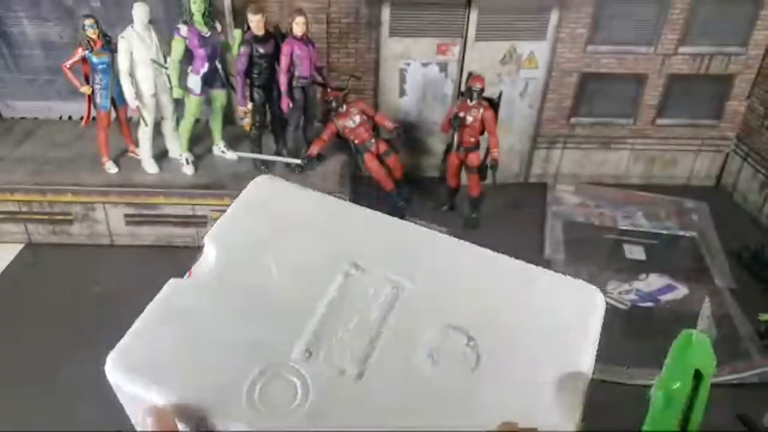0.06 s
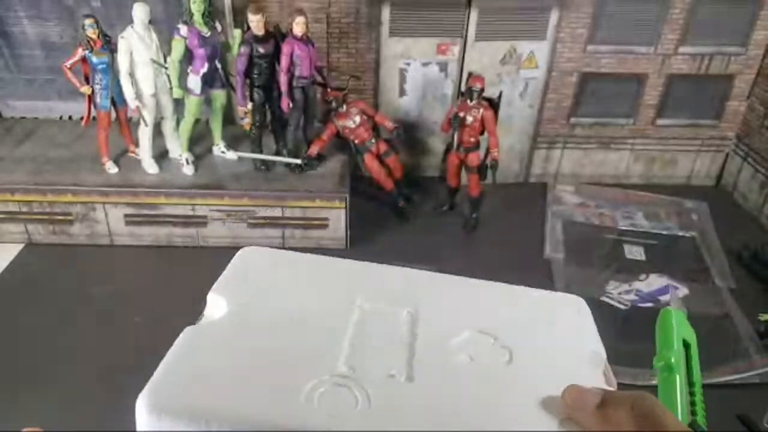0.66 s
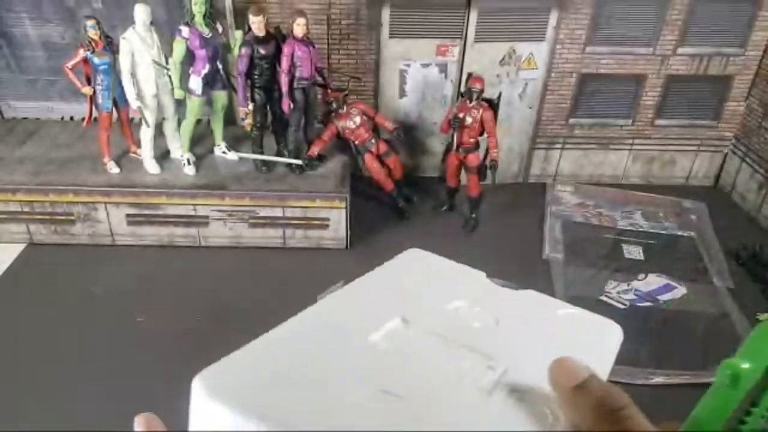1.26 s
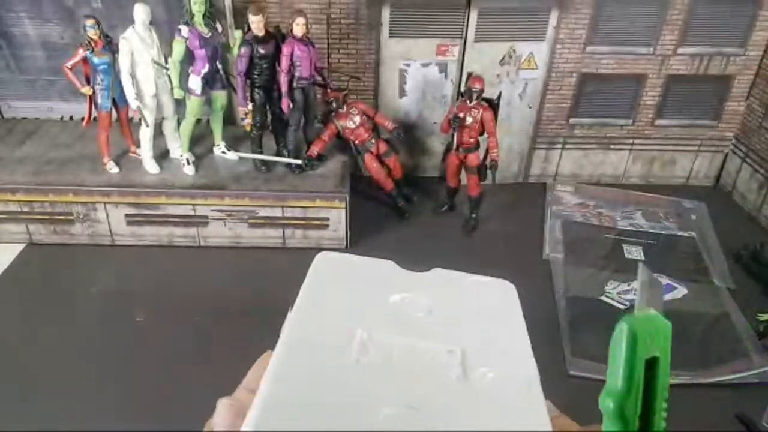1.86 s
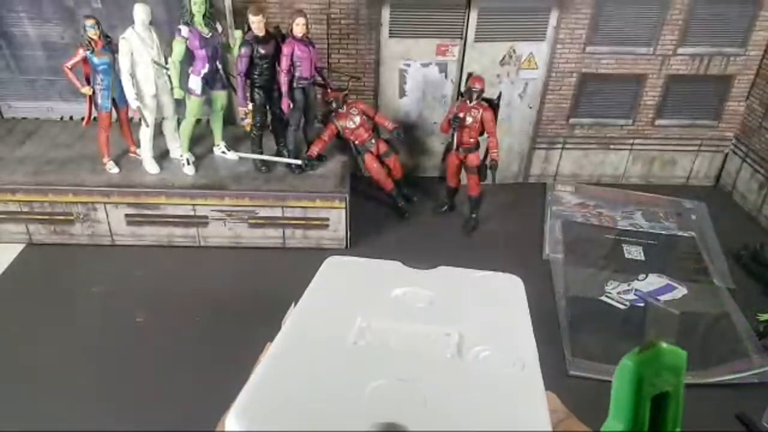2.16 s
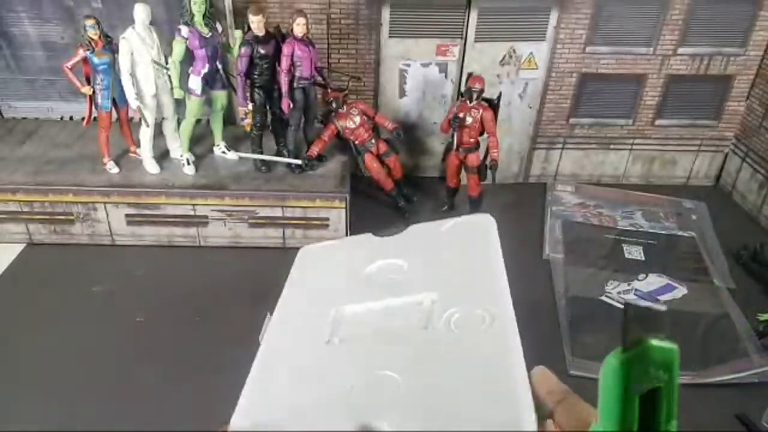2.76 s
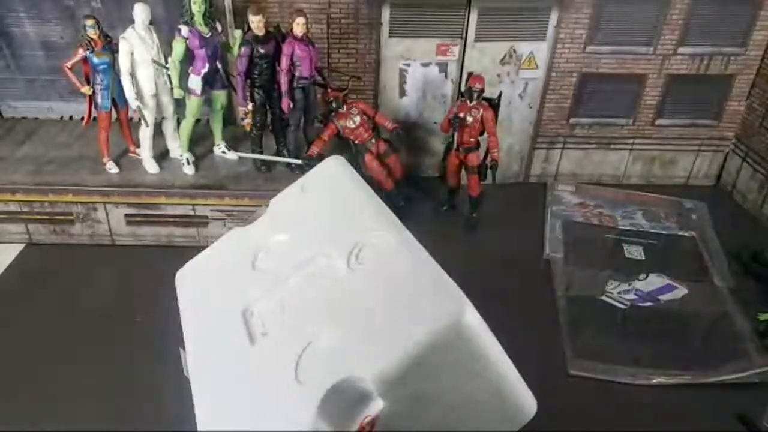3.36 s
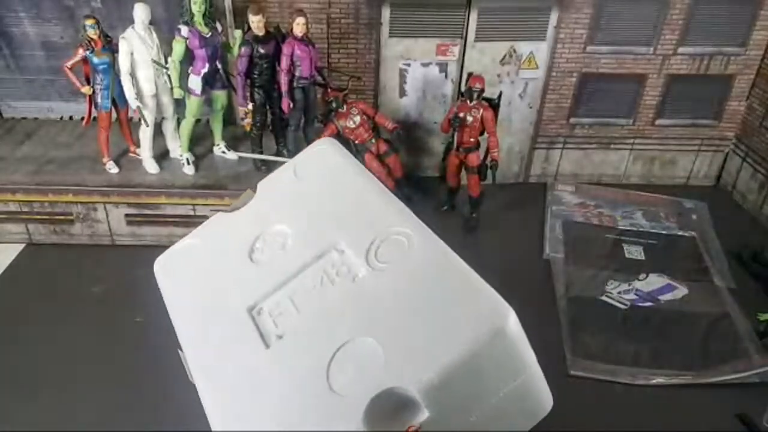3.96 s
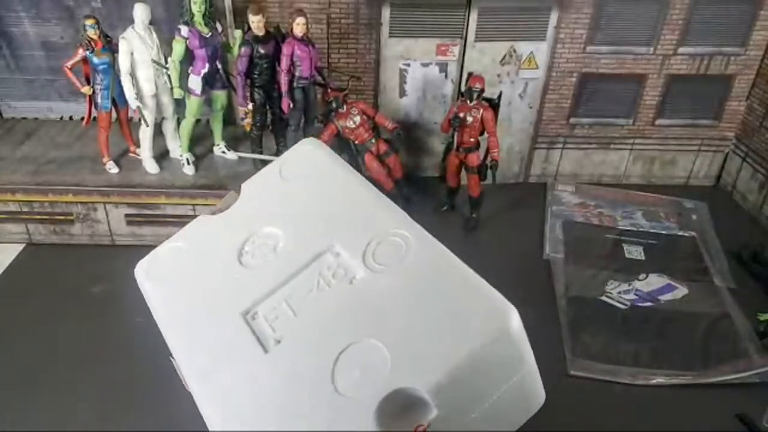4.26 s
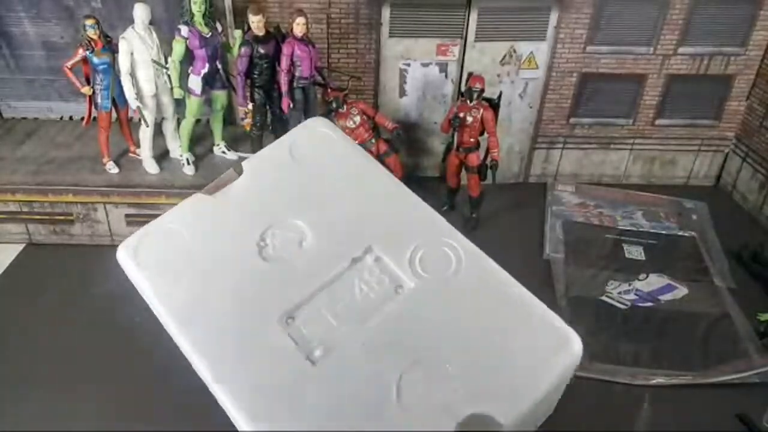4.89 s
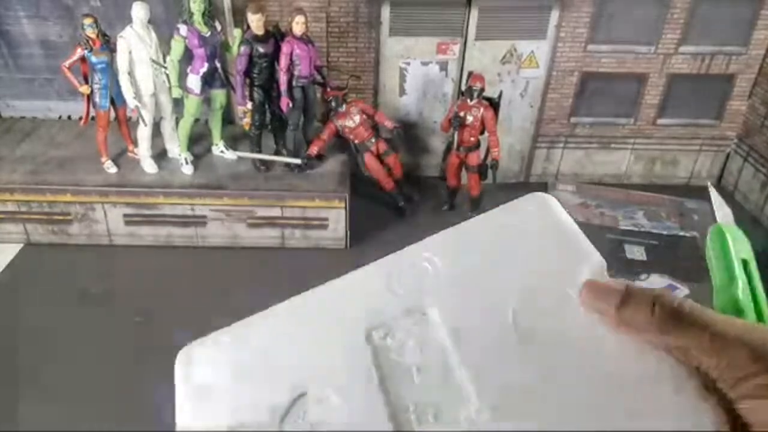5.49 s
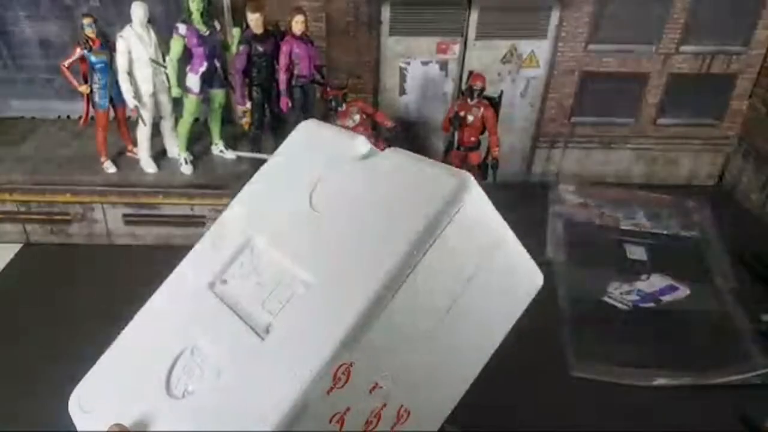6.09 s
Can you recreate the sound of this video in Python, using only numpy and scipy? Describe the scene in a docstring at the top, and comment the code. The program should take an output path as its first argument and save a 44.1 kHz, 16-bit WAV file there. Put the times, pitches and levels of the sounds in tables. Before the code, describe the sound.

Hands turn a hollow styrofoam insert close to the microphone. Skin slides over the foam in a run of hissing, scratchy strokes with a hollow rustle, dull finger bumps and small clicks from the foam or a plastic box cutter. A sharp snap comes midway. The handling then thins to faint squeaks and a sudden creak before the scraping briefly returns. The small room is quiet, with a faint hum.

```python
"""A small room, one microphone close to a hollow styrofoam insert being turned over in the hands.
Skin sticks and slips over the beads in a hiss and a scrape; pinched or dragged, the foam creaks and
squeaks. Its thin walls answer with a hollow rustle, a rumble and dull bumps. Now and then the foam
catches and snaps free, or a plastic box cutter held in one hand clacks.
Behind it are short reflections, still air and a faint hum."""
import sys
import numpy as np
from scipy import signal
from scipy.fft import rfft, irfft, next_fast_len
from scipy.io import wavfile

SR = 44100
rng = np.random.default_rng(int(sys.argv[2]) if len(sys.argv) > 2 else 0)


def to_wav(s):
    """Save 16-bit WAV."""
    ch = np.atleast_2d(s).T  # columns
    pcm = np.round(np.clip(ch, -1, 1) * 32767)  # PCM
    wavfile.write(sys.argv[1], SR, pcm.astype(np.int16))


N = 274743
TIME = np.arange(N) / SR

# Levels in the tables are relative; each source sets its own gain.
# skin sliding over the foam: start_s, rise_s, hold_s, hiss_db, scrape_db, hollow_db
HAND_STROKES = [(-0.06, 0.1105, 0.0595, -44, -64.5, -70), (0.159, 0.1403, 0.0478, -42.5, -50.5, -62.5),
                (0.445, 0.019, 0.0021, -47, -77, -81.5), (0.49, 0.01197, .002, -51.5, -92, -88.5),
                (0.537, 0.0396, 0.034, -40, -63.5, -68), (0.628, 0.0874, 0.0077, -44.5, -69.5, -72),
                (0.766, 0.1902, 0.042, -40.5, -60, -66), (1.044, 0.1067, 0.0644, -41.5, -65, -71),
                (1.122, 0.1937, 0.03, -38.5, -57.5, -62.5), (1.352, 0.0463, 0.0445, -47, -68, -66),
                (1.448, 0.111, 0.111, -47, -72, -77), (1.625, .13, 0.0347, -39.5, -53, -55),
                (1.753, 0.1827, 0.0093, -35, -53.5, -61), (1.96, 0.1183, 0.0146, -41, -58.5, -65),
                (2.114, 0.0715, 0.0422, -43, -57, -60), (2.231, 0.0494, 0.0584, -48, -59.5, -54.5),
                (2.349, 0.0243, 0.0152, -46.5, -58.5, -54), (2.387, 0.0674, 0.0336, -39.5, -54.5, -60.5),
                (2.495, 0.046, 0.082, -44, -57.5, -57.5), (2.602, 0.0712, 0.0438, -41, -56, -58),
                (2.729, 0.0296, .05, -45, -62.5, -74), (2.905, 0.015, 0.025, -62, -72.5, -77),
                (2.973, 0.0149, 0.0296, -50, -60.5, -73), (3.057, 0.0332, .008, -42.5, -47, -58),
                (3.108, 0.0502, .01, -41.5, -59, -65), (3.315, 0.0147, 0.122, -55.5, -75, -90),
                (3.966, 0.027, 0.043, -55, -71, -80), (4.033, 0.0168, 0.057, -52, -63, -74),
                (4.271, 0.0051, 0.0382, -30, -48.5, -51), (4.347, 0.018, 0.036, -74.5, -83.5, -61),
                (4.414, 0.042, 0.0112, -79.5, -91, -69.5), (4.493, 0.0126, 0.0228, -46, -68.5, -84),
                (4.521, 0.034, 0.0091, -38, -66.5, -84.5), (4.632, 0.0436, 0.079, -56.5, -67, -71.5),
                (4.773, 0.007, 0.0235, -65, -61, -88), (4.818, 0.035, 0.13, -55, -77.5, -95.5),
                (4.972, 0.0182, 0.028, -38, -56, -58), (5.056, 0.0713, 0.0614, -46, -62.5, -71.5),
                (5.253, 0.0236, 0.0394, -38, -54.5, -62), (5.364, 0.0154, 0.0127, -38, -52, -49.5),
                (5.402, 0.0383, 0.038, -41, -58.5, -65.5), (5.482, 0.0413, 0.0103, -35.5, -51.5, -53),
                (5.701, 0.0073, 0.0332, -55, -68.5, -66.5), (5.806, 0.0043, 0.0081, -56, -65.5, -67.5),
                (5.886, 0.0605, 0.0075, -59, -74, -85.5), (6.002, 0.0039, 0.01, -56.5, -62.5, -75.5)]
# the soft palm's share of the scrape's power, capped at 1 in use: time_s, share
PALM_CONTACT = [(0.18, 3.83), (0.24, 1.05), (0.42, 3.1), (0.47, 0.9)]
# foam catches and cutter clacks: start_s, level_db, ring_hz, treble_db, knock_db, slip_s
SNAPS = [(0.5927, -44, 2075, -57.5, -62, 0.00094), (0.916, -43, 3000, -54.5, -62.5, 0.0054),
         (1.059, -43, 5940, -44, -62.5, 0.0025), (1.3375, -26, 2879, -43.5, -51, .0044),
         (1.768, -30.5, 5460, -38, -57, .003), (1.8234, -35.5, 2823, -48, -66.5, 0.0058),
         (1.8736, -37.5, 4010, -56, -71.5, .003), (2.057, -33.5, 5174, -52, -77, .003),
         (2.5585, -34.5, 5520, -60.5, -72.5, .005), (2.9872, -32.5, 3014, -34, -66.5, .0045),
         (3.056, -34, 2324, -35, -60, .0043), (3.0787, -16.5, 2150, -24, -46, 0.001685),
         (3.0823, -32.5, 2006, -29.5, -45, .006), (3.1593, -27.5, 2868, -34, -74, 0.0039),
         (3.27, -43, 2854, -71.5, -88.5, 0.0058), (3.401, -45.5, 2930, -58, -74.5, 0.0051),
         (4.056, -43.5, 2100, -51.5, -75, .003), (4.2774, -25.5, 1734, -29.5, -47.5, 0.00223),
         (4.327, -33, 1733, -34.5, -57, 0.0056), (4.611, -30.5, 5530, -46, -70.5, 0.0037),
         (4.7708, -30.5, 2626, -30, -71.5, .005), (5.005, -44, 1870, -40.5, -71, 0.0021),
         (5.1217, -39, 5900, -41, -62, 0.0033), (5.2946, -38.5, 2380, -42, -61.5, 0.00405),
         (5.7067, -54, 2680, -46, -63, 0.0045), (5.811, -51, 1755, -51.5, -67, 0.0035),
         (6.0043, -38.5, 2350, -42, -76, 0.0055), (6.0261, -41, 3120, -57.5, -83.5, .005)]
# fingers bumping the block: start_s, wall_db, pop_db
FINGER_BUMPS = [(0.916, -46, -66), (1.334, -44, -67), (1.755, -31, -34.5), (1.78, -41, -59),
                (2.077, -86, -63), (4.983, -48.5, -60), (5.381, -40.5, -48), (5.449, -41, -58.5)]
# the grip shifting: start_s, length_s, level_db
GRIP_SHIFTS = [(0.28, 0.08, -58.5), (0.565, 0.17, -68.5), (0.776, 0.189, -62.5), (0.996, 0.079, -69),
               (1.333, 0.0247, -68), (1.703, .1, -55.5), (2.064, 0.042, -62.5), (2.58, 0.034, -64.5),
               (3.074, .03, -67.5), (3.31, 0.1075, -70.5), (4.975, 0.02, -61.5), (5.114, 0.028, -70),
               (5.254, 0.123, -64.5), (5.373, 0.104, -46.5), (5.494, 0.034, -57), (5.676, 0.0223, -68)]
# where the hollow answers as the hands move over it: time_s, pitch_hz
HOLLOW_CENTRE = [(2.2, 880), (2.35, 721), (2.55, 921), (3.1, 761.6), (4.3, 810), (4.41, 975), (4.47, 470),
                 (4.7, 933), (5.0, 743), (5.3, 848), (5.46, 615), (5.75, 908)]
# pinched foam: start_s, rise_s, hold_s, level_db, centre_hz, slips_per_s
PINCHES = [(0.0, 0.052, 0.055, -71, 1910, 300), (3.643, 0.0148, 0.0686, -68.5, 2200, 126),
           (3.892, 0.016, .04, -77, 2070, 68), (3.953, 0.031, 0.151, -67.5, 2234, 600),
           (3.975, 0.0204, 0.041, -65, 4750, 967), (4.275, 0.00235, 0.0422, -41, 1648, 469),
           (4.611, 0.0039, 0.026, -62, 1910, 500), (4.661, 0.0237, 0.065, -64.5, 2116, 87),
           (4.79, 0.0207, 0.145, -72, 2190, 200), (4.977, 0.0057, 0.049, -54, 1725, 340),
           (5.15, 0.0184, 0.0376, -63.5, 1853, 180), (5.94, 0.0044, 0.0208, -64, 2155, 216),
           (6.003, .003, 0.0196, -57, 2290, 347)]
# a fingertip dragging steadily: start_s, rise_s, hold_s, level_db, pitch_hz
FINGERTIP_DRAGS = [(0.01, 0.052, 0.061, -72, 1895), (3.955, 0.032, 0.1334, -66.5, 2130),
                   (4.791, 0.032, 0.145, -75, 2133)]

# tone colours: frequency_hz, gain_db
BEAD_SPECTRUM = [(3000, -38), (6500, -16.5), (7900, -23), (8600, -16.5), (9500, -10), (10050, -6.5),
                 (10300, -7.5), (11200, -3), (11850, 0.5), (12300, -1.5), (13150, 1), (14600, -2.5),
                 (15650, 0)]  # hissing beads
FINGER_SPECTRUM = [(900, -25.5), (1350, -14.5), (1850, -1.5), (2300, -10.5), (2600, -9.5), (3100, -6),
                   (3800, -14.5), (5500, 8), (6600, -2.5), (8000, -6.5), (11000, -26.5)]  # scraping fingers
PALM_SPECTRUM = [(170, -14.5), (250, -3.5), (390, -3.5), (600, -12), (900, -10.5), (1200, -1.5),
                 (1500, -3.5), (1900, 3), (2400, 1.5), (3300, 0), (4500, -2), (6000, -11.5), (9000, -29.5)]  # brushing palm
CRACK_SPECTRUM = [(700, -13), (1200, -17), (1600, 6.5), (2200, -1), (2600, -5), (3100, 0), (3700, -6),
                  (5500, 4), (6800, -14), (8000, -11), (12000, -27.5)]  # a snap through the shell
KNOCK_SPECTRUM = [(170, -38.5), (290, -15.5), (370, -4.5), (550, -4), (780, 1), (1100, -11), (1800, -12)]  # the low knock under a snap
RUMBLE_SPECTRUM = [(25, -44), (45, -13), (70, 5), (95, -5), (122, 5), (165, 0), (225, 1.5), (300, -4.5),
                   (400, -9), (600, -20.5), (1500, -52)]  # thin walls under the grip
AIR_SPECTRUM = [(25, -22.5), (50, -2), (80, 5.5), (130, -1), (220, -9.5), (400, -15), (530, -17.5),
                (700, -22.5), (1500, -22.5), (4000, -32.5), (8000, -45.5), (12000, -10), (15700, -13)]  # the quiet room

# resonances: pitch_hz, gain_db, t60_s
SHELL_RESONANCES = [(1501, -6.5, 0.044), (1753.6, -5.5, 0.05), (1812.4, 0.5, 0.025), (1991, -7.5, 0.05),
                    (2136, -5, 0.012), (2428, -5.5, .02), (2921, 3, 0.071), (3030, -6.5, 0.013),
                    (3940, 2.5, 0.017), (4700, -6, 0.021), (5370, -5, 0.021), (5530, -13, .015)]  # the foam shell, scraped or pinched
HOLLOW_RESONANCES = [(443.7, -3, .06), (546.3, 1.5, 0.048), (651.7, -1, 0.041), (786.2, -1, 0.02),
                     (901, -1, 0.017), (1082.4, 0.5, .035), (1201.5, 3, 0.043)]  # the hollow inside
WALL_RESONANCES = [(65.3, -4, 0.263), (122.4, 6.5, 0.0597), (233.06, 7, 0.114), (370.6, -3, 0.085),
                   (557.5, -10, 0.19), (624.2, -11.5, 0.2)]  # the foam walls, bumped


def rubbing(hiss_drive, scrape_drive, hiss_bite_db=1.5055, scrape_bite_db=2.5):
    """Skin slips from bead to bead, close up; the uneven drag shakes beads and shell together."""
    drag = 1.2 * drift(55) + 0.5 * drift(260)
    beads = colour(slips(per_s=11000, spread_db=1.0), BEAD_SPECTRUM)
    hiss = hiss_drive * from_db(hiss_bite_db * drag) * beads
    force = from_db(scrape_bite_db * drag) * slips(per_s=5000, spread_db=-0.5)
    # the contact wanders, so the ringing shell shifts its colour
    shell = pressed(force, 2500 + 450 * drift(6.4), SHELL_RESONANCES, reach_hz=2600)
    fingers = from_db(-1.2) * colour(force, FINGER_SPECTRUM) + from_db(-2.5) * shell
    palm = from_db(-0.59) * colour(slips(per_s=9000, spread_db=3.5), PALM_SPECTRUM)
    share = np.clip(in_time(PALM_CONTACT), 0, 1)
    scrape = np.sqrt(1 - share) * fingers + np.sqrt(share) * palm
    return hiss + scrape_drive * scrape


def stroke_drives():
    """How hard the sliding hands drive beads, shell and hollow; resting fingers never lie quite still."""
    start, rise, hold, hiss_db, scrape_db, hollow_db = np.transpose(HAND_STROKES)

    def drive(levels_db, release_db_per_s, resting_db):
        return np.hypot(pushes(start, rise, hold, levels_db, release_db_per_s), from_db(resting_db))

    return (drive(hiss_db, release_db_per_s=244, resting_db=-71.5),
            drive(scrape_db, release_db_per_s=205, resting_db=-84),
            drive(hollow_db, release_db_per_s=180, resting_db=-86))


def snaps(spot_t60_s=0.0063, ring_t60_s=0.022):
    """Each catch or clack crackles in the beads, cracks through the shell, knocks and rings briefly."""
    beads, crack, knock, rings = np.zeros((4, N))
    for start, level_db, ring_hz, treble_db, knock_db, slip_s in SNAPS:
        force = cascade(start, slip_s)
        crack += from_db(level_db + 9.5) * force
        knock += from_db(knock_db + 26) * force
        beads += from_db(treble_db + 26.5) * cascade(start, slip_s * 1.3)
        span = slice(round((start - .002) * SR), round((start + .08) * SR))
        # the spot that lets go colours the whole cascade with a broad resonance
        spot = np.diff(ring(force[span], ring_hz, spot_t60_s), prepend=0)
        rings[span] += from_db(level_db + 8) * spot / np.linalg.norm(spot)
        # the main snap rings on, low shell modes more strongly than high ones
        snap = signal.unit_impulse(len(spot), round(.0025 * SR))
        rings[span] += from_db(level_db - 8) * (1900 / ring_hz) ** 1.8 * ring(snap, ring_hz, ring_t60_s)
    crackle = colour(crack, CRACK_SPECTRUM) + colour(beads, BEAD_SPECTRUM)
    return crackle + colour(knock, KNOCK_SPECTRUM) + highpass(rings, 1000, order=2)


def bumps(pop_hz=790, pop_t60_s=0.00866):
    """A soft fingertip sets the light walls booming, with a short hollow pop."""
    start, wall_db, pop_db = np.transpose(FINGER_BUMPS)
    at = np.round(start * SR).astype(int)
    push = np.zeros(N)
    push[at] = from_db(pop_db + 9)
    out = ring(push, pop_hz, pop_t60_s)
    for k, (hz, mode_db, t60) in enumerate(WALL_RESONANCES):
        push[at] = from_db(wall_db - 12 + mode_db + rng.standard_normal(len(at)))
        out += (-1) ** k * ring(push, hz, t60)
    return out


def hollow_rustle(drive, flutter_db=2.0):
    """Coarser slips ring the hollow, its pitch moving with the hands."""
    force = slips(per_s=1200, spread_db=2.0) * from_db(flutter_db * drift(60))
    return drive * from_db(-3) * pressed(force, in_time(HOLLOW_CENTRE), HOLLOW_RESONANCES, reach_hz=228)


def grip_rumble(rise_s=0.0138, flutter_db=1.63):
    """The grip shifts and the thin walls rumble."""
    start, length, level_db = np.transpose(GRIP_SHIFTS)
    shifts = pushes(start, np.full(len(start), rise_s), length - rise_s, level_db, release_db_per_s=206)
    flutter = from_db(flutter_db * drift(40) - 1)
    return shifts * flutter * colour(slips(per_s=990, spread_db=2.0), RUMBLE_SPECTRUM)


def creaks(unsteady=0.36, uneven_db=4.5):
    """Pinched foam sticks and slips in an uneven train that rings the shell."""
    out = np.zeros(N)
    speed = np.exp(unsteady * drift(300))
    strength = from_db(uneven_db * drift(370))
    for start, rise, hold, level_db, centre_hz, slips_per_s in PINCHES:
        span = slice(round(start * SR), round(start * SR) + round(.26 * SR))
        slip_count = np.floor(np.cumsum(slips_per_s * speed[span]) / SR)
        force = np.diff(slip_count, prepend=-1) * strength[span]
        pinch = from_db(level_db - 1) * swell(TIME[span] - start, rise, hold, release_db_per_s=547.5)
        out[span] += pinch * pressed(force, centre_hz, SHELL_RESONANCES, reach_hz=240)
    return out


def squeaks(waver=.05, flutter_db=3.5):
    """Under a steady drag the slips lock to one mode of the shell and give a thin, wavering tone."""
    out = np.zeros(N)
    for start, rise, hold, level_db, pitch_hz in FINGERTIP_DRAGS:
        cycles = np.cumsum(pitch_hz * (1 + waver * drift(550))) / SR
        level = from_db(level_db + flutter_db * drift(150))
        drag = swell(TIME - start, rise, hold, release_db_per_s=349.5)
        out += level * drag * rms_one(np.sin(2 * np.pi * cycles))
    return out


def reflections(sound, split_hz=6000, low_t60_s=0.23, treble_t60_s=0.24, gap_s=0.0082):
    """The desk and near walls send a short, dense tail back to the microphone."""
    age = TIME[:SR // 2]
    noise = rng.standard_normal(len(age))
    low = signal.sosfilt(signal.butter(1, split_hz, fs=SR, output="sos"), noise)
    tail = low * from_db(-60 * age / low_t60_s) + (noise - low) * from_db(-60 * age / treble_t60_s)
    tail *= np.clip(age / gap_s - .5, 0, 1)
    return signal.fftconvolve(sound, tail / np.linalg.norm(tail))[:N]


def room_tone(air_db=-68.5, hum_hz=539.9, hum_db=-86.5):
    """Still room air with a faint wavering hum."""
    hum = rms_one(ring(rng.standard_normal(N), hum_hz, t60_s=0.16))
    air = colour(rng.standard_normal(N), AIR_SPECTRUM)
    return from_db(air_db) * air + from_db(hum_db) * hum


def slips(per_s, spread_db):
    """Random tiny stick-slip releases of uneven size; rms 1."""
    sizes = from_db(spread_db * np.minimum(rng.exponential(1, N), 4))
    return rms_one((rng.random(N) < per_s / SR) * sizes * rng.choice([-1, 1], N))


def cascade(start_s, decay_s, rise_s=0.0014, lead_s=0.00087):
    """A quick run of slips that swells and dies; energy 1."""
    age = TIME[:3000]
    envelope = (1 - np.exp(-age / rise_s)) ** 2 * np.exp(-age / decay_s)
    run = rng.standard_normal(len(age)) * envelope
    force = np.zeros(N)
    at = round((start_s - lead_s) * SR)
    force[at:at + len(run)] = run[:N - at] / np.linalg.norm(run)
    return force


def pressed(force, centre_hz, modes, reach_hz):
    """The pressed spot picks the modes that answer: those near the centre pitch; steady loudness."""
    weights = np.array([from_db(db) / (1 + ((hz - centre_hz) / reach_hz) ** 2) for hz, db, _ in modes])
    weights /= np.linalg.norm(weights, axis=0)
    # every slip strikes each mode with a strength of its own
    sound = sum(weight * rms_one(ring(force * rng.standard_normal(len(force)), hz, t60))
                for weight, (hz, _, t60) in zip(weights, modes))
    # a light wall radiates little below its lowest mode
    return highpass(sound, .75 * modes[0][0], order=3)


def ring(force, hz, t60_s):
    """One mode: a unit click sets off a decaying sine of height 1."""
    decay, step = from_db(-60 / (t60_s * SR)), 2 * np.pi * hz / SR
    return signal.lfilter([0, np.sin(step)], [1, -2 * decay * np.cos(step), decay ** 2], force + 1e-18)


def swell(age, rise, hold, release_db_per_s):
    """One push of the hand: it builds up, holds, then dies away evenly in dB."""
    attack = np.sin(np.pi / 2 * np.clip(age / rise, 0, 1)) ** 2
    return attack * from_db(-release_db_per_s * np.clip(age - rise - hold, 0, 1))


def pushes(starts, rises, holds, levels_db, release_db_per_s):
    """Strength in time of a row of pushes; where they overlap their powers add."""
    coarse_time = TIME[::32]
    power = sum((from_db(db) * swell(coarse_time - start, rise, hold, release_db_per_s)) ** 2
                for start, rise, hold, db in zip(starts, rises, holds, levels_db))
    return np.interp(TIME, coarse_time, np.sqrt(power))


def colour(sound, spectrum):
    """Causal (minimum-phase) filter with the given spectrum; white noise keeps its power."""
    size = next_fast_len(len(sound) + 4096, True)
    hz, db = np.transpose(spectrum)
    grid_hz = np.maximum(np.fft.rfftfreq(size, 1 / SR), 1)
    shape_db = np.interp(np.log(grid_hz), np.log(hz), db, left=db[0] - 20)
    rolloff_db = 24 * np.log2(np.maximum(grid_hz / hz[-1], 1))
    cepstrum = irfft(np.log(rms_one(from_db(shape_db - rolloff_db))), size)
    cepstrum[1:size // 2] *= 2
    cepstrum[size // 2 + 1:] = 0
    return irfft(rfft(sound, size) * np.exp(rfft(cepstrum)), size)[:len(sound)]


def drift(per_s):
    """A random wander that takes a new course `per_s` times a second."""
    knots = rng.standard_normal(8000)
    return np.interp(TIME * per_s, np.arange(len(knots)), knots)


def in_time(rows):
    """Timed values joined by straight lines, held at both ends."""
    return np.interp(TIME, *np.transpose(rows))


def highpass(sound, hz, order):
    return signal.sosfilt(signal.butter(order, hz, "high", fs=SR, output="sos"), sound)


def from_db(db):
    return 10 ** (np.asarray(db) / 20)


def rms_one(sound):
    return sound / np.sqrt(np.mean(sound ** 2) + 1e-20)


def scene():
    """Foam close up, the room behind it; one microphone, so both channels are alike."""
    hiss_drive, scrape_drive, hollow_drive = stroke_drives()
    friction = rubbing(hiss_drive, scrape_drive) + hollow_rustle(hollow_drive)
    friction += grip_rumble() + creaks() + squeaks()
    hits = snaps() + bumps()
    room = reflections(from_db(-13) * friction + from_db(-7) * hits)
    mono = friction + hits + room + room_tone()
    return np.array([mono, mono])


def record(dry, low_cut_hz=36, top_cut_hz=15850):
    """The microphone drops the deepest bass, and the top is cut steeply."""
    top_cut = signal.ellip(12, .2, 70, top_cut_hz, fs=SR, output="sos")
    return signal.sosfilt(top_cut, highpass(dry, low_cut_hz, order=3))


dry = scene()
out = record(dry)
to_wav(out)
```